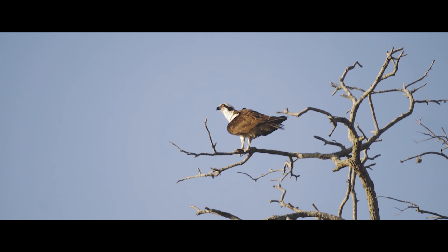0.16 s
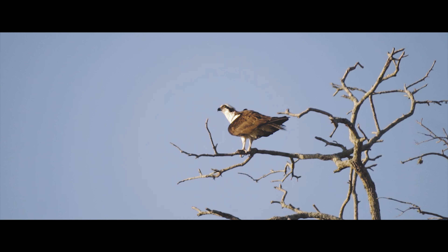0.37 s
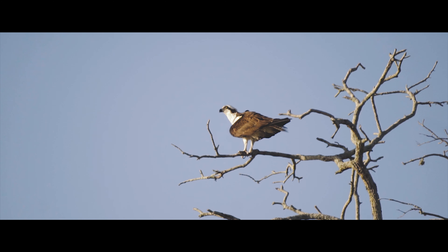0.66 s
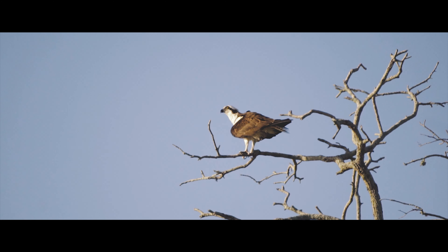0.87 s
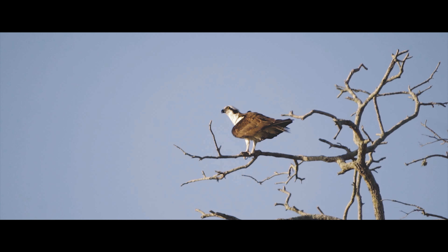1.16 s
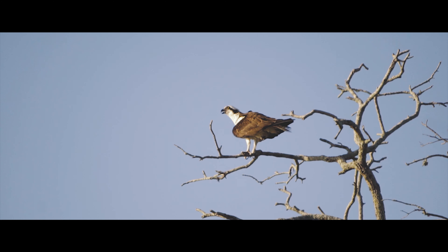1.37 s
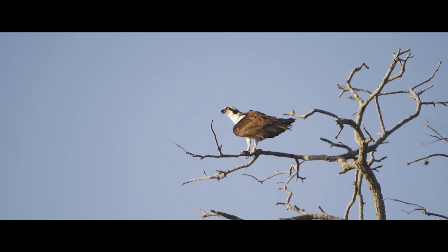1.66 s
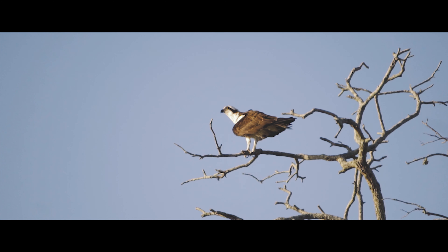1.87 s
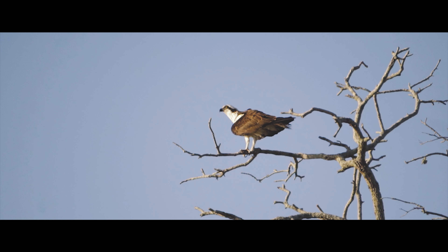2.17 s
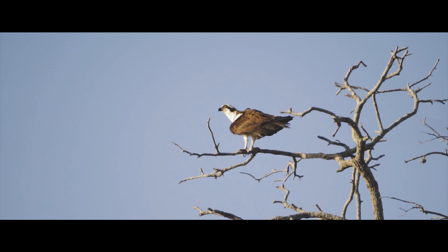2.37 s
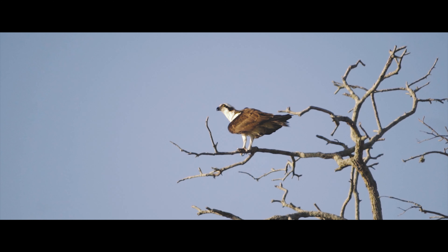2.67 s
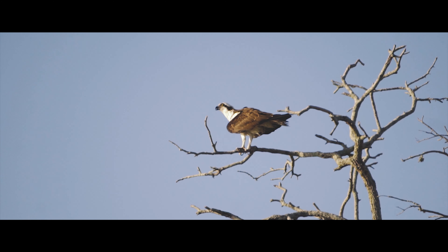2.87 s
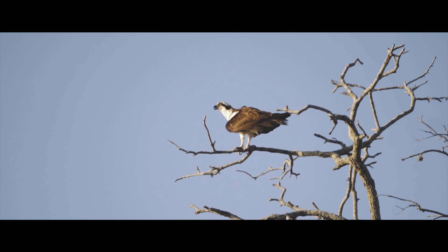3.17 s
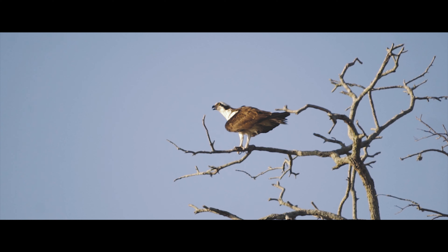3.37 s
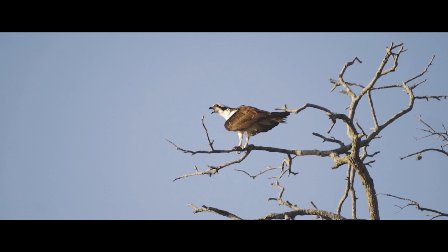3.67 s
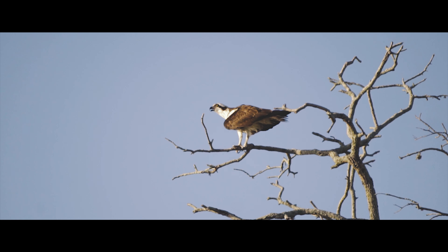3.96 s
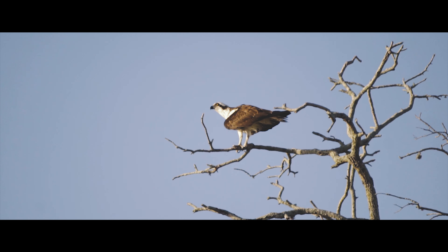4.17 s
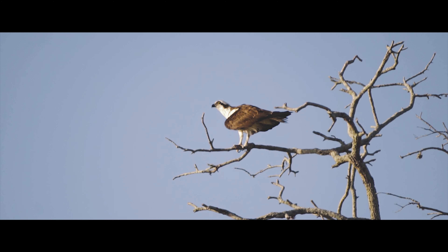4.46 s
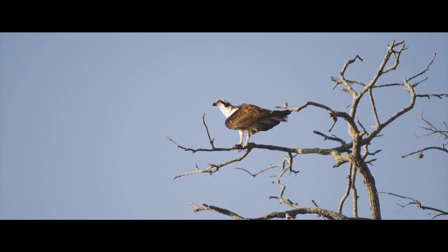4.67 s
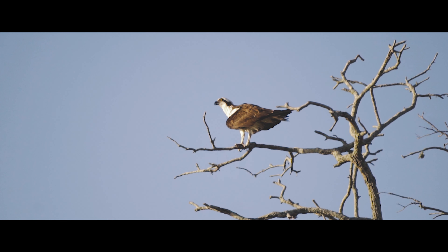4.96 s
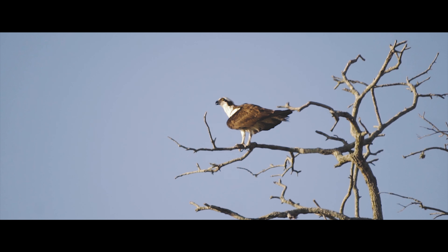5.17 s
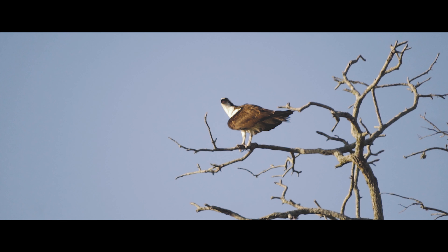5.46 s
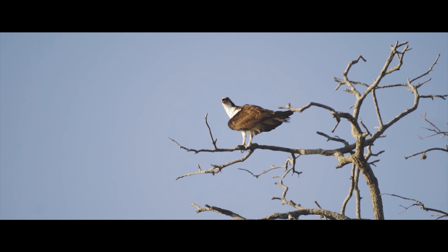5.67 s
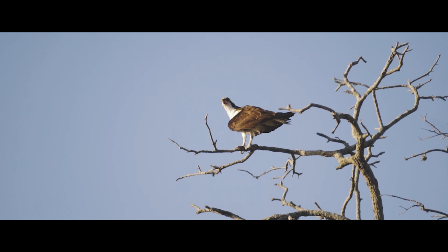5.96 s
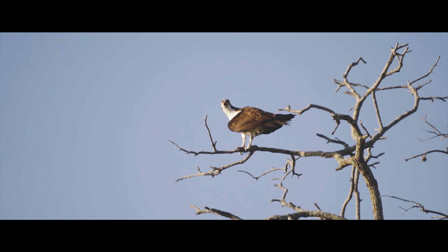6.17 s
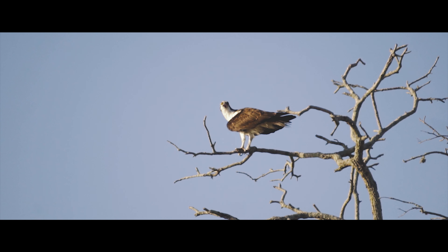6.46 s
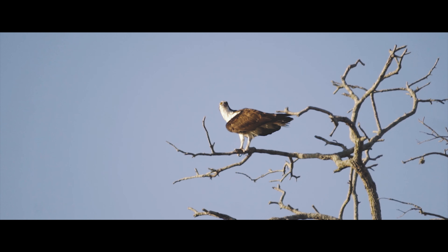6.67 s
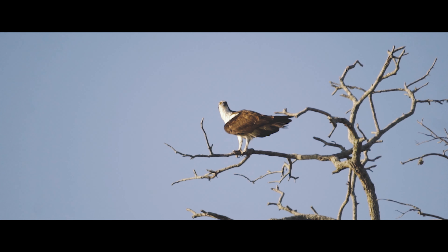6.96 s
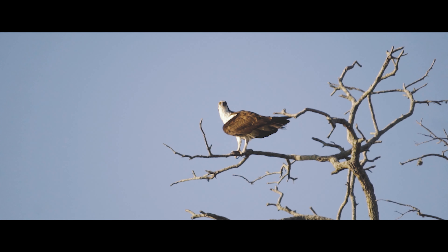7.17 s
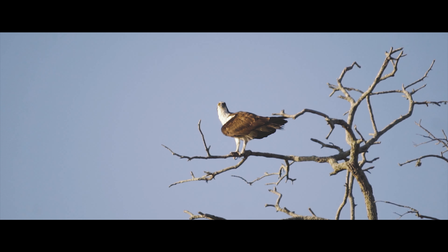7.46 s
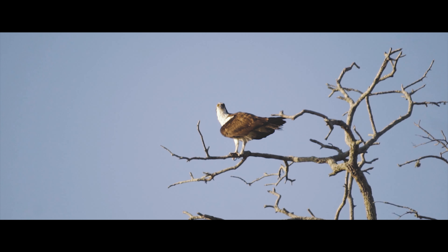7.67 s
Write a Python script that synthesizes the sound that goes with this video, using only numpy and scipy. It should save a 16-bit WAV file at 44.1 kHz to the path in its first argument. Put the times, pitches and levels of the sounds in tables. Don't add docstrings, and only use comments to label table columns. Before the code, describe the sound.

Outdoors, an osprey perched in a bare tree whistles three times, over two seconds apart. Each call is a brief, nearly pure tone sliding downward; the second starts higher and drops steeply, and the third is loudest with a tiny raspy flutter at its start. Woods return a long diffuse echo. Tiny birds chip far away over low wind and distant traffic. One mono camera microphone, calls fairly direct.

```python
import sys
import numpy as np
from scipy import signal
from scipy.fft import rfft, irfft
from scipy.io import wavfile
from scipy.ndimage import uniform_filter1d

SR = 44100
rng = np.random.default_rng(int(sys.argv[2]) if len(sys.argv) > 2 else 0)


def dump_mix(stems):
    frames = np.atleast_2d(stems).T
    limited = np.clip(frames, -1, 1)
    pcm = np.round(limited * 32767).astype(np.int16)
    wavfile.write(sys.argv[1], SR, pcm)


def volts_from_db(level):
    exponent = np.asarray(level, float) / 20
    return 10 ** exponent


N = 344862
t = np.arange(N) / SR


def band(x, lo_hz, hi_hz):
    return signal.sosfilt(signal.butter(2, [lo_hz, hi_hz], "band", fs=SR, output="sos"), x)


def steep_band(x, lo_hz, hi_hz):
    return band(band(x, lo_hz, hi_hz), lo_hz, hi_hz)


def unit(x):
    return x / np.sqrt(np.mean(x ** 2))


def smooth_twice(x, size):
    return uniform_filter1d(uniform_filter1d(x, size), size)


def colour(table, hz):
    f, db = np.transpose(table)
    return np.interp(np.log(hz), np.log(f), db)


def walk(rate):
    hold = int(SR / rate)
    steps = np.repeat(rng.standard_normal(N // hold + 1), hold)
    return unit(smooth_twice(steps, hold)[:N])


def decay(s, t60):
    return np.exp(-np.log(1000) * s / t60)


def flutter():
    start, end, flutter_hz = 6.443, 6.482, 235
    rough = np.interp(t, [start, start + 0.00056, end - .015, end], [0, 1, 1, 0])
    cycles = np.cumsum(flutter_hz * (1 + .1 * walk(200))) / SR
    return rough, rough * (np.sin(2 * np.pi * cycles) + .3 * walk(700))


# f/Hz, level/dB
BEAK_COLOUR = [(1750, 5.5), (2050, -1), (2350, 8), (2850, -5.5), (3300, -2), (3720, -0.5), (4350, 0),
               (5000, 0)]
# f/Hz, level/dB
THROAT_COLOUR = [(4200, 1), (4700, 13), (5200, 10.5), (6000, -8.5), (6500, -4.5), (7000, -2), (7800, -5),
                 (8500, 1.5), (9200, -1), (9700, -16.5)]
# second to fourth partial at edge 0, level/dB
LOWER_PARTIALS_DB = [(-46, -57, -70.5), (-38.5, -50.5, -67), (-32, -47, -53)]
# fifth to ninth partial at full voice, level/dB
HIGHER_PARTIALS_DB = [(-87.5, -81.5, -88.5, -97, -100), (-80, -87.5, -79.5, -85.5, -96),
                      (-58, -65.5, -71.5, -79, -87)]


def partial_levels(which, on, hz, voice_db, edge_db, rough, eddies):
    growth = .65, 1.0, .5
    rasp_bright_db = -10, -3, -7
    soft_db, soft_loss = 12, (0, 0, 1.5)
    unsteady_db = 1.5
    knee_db = (-59.5, -58.5, -50)[which]
    rasp_dull_db = 6

    softness_db = np.minimum(voice_db - voice_db.max() + soft_db, 0) * (1 - rough[on])
    levels = [voice_db]
    lower = zip(LOWER_PARTIALS_DB[which], growth, rasp_bright_db, soft_loss)
    for k, (top_db, grow, bright_db, loss) in enumerate(lower, start=2):
        voiced_db = top_db + grow * edge_db + colour(BEAK_COLOUR, k * hz)
        shaken_db = unsteady_db * np.roll(eddies, k * SR)[on]
        levels.append(voiced_db + bright_db * rough[on] + loss * softness_db + shaken_db)
    fade_db = np.minimum(levels[2] - knee_db, 0)
    for k, top_db in enumerate(HIGHER_PARTIALS_DB[which], start=5):
        dull_db = rasp_dull_db * (k - 4) * rough[on]
        levels.append(top_db + fade_db - dull_db + colour(THROAT_COLOUR, k * hz) + 2.5 * walk(30)[on])
    return levels


# t/s, f/Hz, voice level/dB, edge level/dB (how hard the membranes close)
FALLING_WHISTLES = [
    [(1.674, 1237, -63.5, -36.5), (1.684, 1209, -35, -16), (1.7, 1134, -33.5, -11.5),
     (1.722, 1023, -18, 10), (1.75, 981, -24, 5.5), (1.79, 939, -17.5, 1), (1.83, 900, -23.5, -0.5),
     (1.885, 841, -27.5, -6.5), (1.903, 787, -27, -19)],
    [(3.864, 2120, -51, -53), (3.88, 1940, -47, -35.5), (3.898, 1554, -38, -29), (3.912, 1335, -18.5, -7.5),
     (3.96, 1202, -16.5, 0.5), (4.04, 1041, -12.5, 7), (4.072, 976, -23.5, 3.5), (4.095, 957.4, -17, -4),
     (4.152, 889, -26.5, -26)],
    [(6.497, 1467, -13, 5.5), (6.526, 1368, -15, -1), (6.548, 1333, -9.5, 6.5), (6.575, 1277, -13.5, -3.5),
     (6.6, 1222, -13, 5), (6.64, 1131, -15, -3.5), (6.685, 1049, -16.5, -4), (6.705, 1033, -15.5, -1),
     (6.722, 1000, -25, -13)],
]
# t/s, f/Hz, voice level/dB, edge level/dB
RASP_ONSET = [
    (6.443, 1480, -43, -5),
    (6.451, 1620, -34, -1),
    (6.463, 1740, -31, -4),
    (6.481, 1750, -24.5, -3),
    (6.492, 1500, -17, 4),
]
# throat ring level/dB, wide noise level/dB, both under the first partial
BREATH_LEVELS = [(-58, -70), (-58, -66), (-52, -53)]


def osprey():
    depth, bend = .4, .1
    attack_s, release_s = .0014, .016
    rasp_air_db = -52
    out = np.zeros(N)
    rough, rasp = flutter()
    waver = 0.0012 * walk(90)
    air = rng.standard_normal(N)
    ring, wide = unit(band(air, 4760, 5200)), unit(steep_band(air, 1800, 5900))
    eddies = unit(smooth_twice(air, SR // 40))
    calls = FALLING_WHISTLES[0], FALLING_WHISTLES[1], [*RASP_ONSET, *FALLING_WHISTLES[2]]
    for which, (call, (ring_db, wide_db)) in enumerate(zip(calls, BREATH_LEVELS)):
        s, *columns = np.transpose(call)
        on = slice(int(s[0] * SR), int(s[-1] * SR))
        hz, voice_db, edge_db = (uniform_filter1d(np.interp(t[on], s, c), 250) for c in columns)
        phase = 2 * np.pi * np.cumsum(hz * (1 + bend * rasp[on] + waver[on])) / SR
        opening, closing = (t[on] - s[0]) / attack_s, (s[-1] - t[on]) / release_s
        gate = np.clip(np.minimum(opening, closing), 0, 1) * (1 + depth * rasp[on])
        breath = volts_from_db(ring_db) * ring[on] + volts_from_db(wide_db) * wide[on]
        out[on] += gate * volts_from_db(voice_db) * breath
        levels = partial_levels(which, on, hz, voice_db, edge_db, rough, eddies)
        for k, level_db in enumerate(levels, start=1):
            partial = np.sin(k * phase + rng.uniform(0, 2 * np.pi))
            out[on] += np.sqrt(2) * volts_from_db(level_db) * gate * partial
    bursts = unit(band(band(air, 1700, 9000), 1700, 6000))
    return out + volts_from_db(rasp_air_db) * rough * (1 + depth * rasp) * bursts


# f/Hz, t60/s, level/dB
WOODS_TAIL = [(870, 2.4, -24), (1290, 2.17, -23.5), (2280, 1.88, -18), (3800, 1.4, -21.5),
              (6500, .7, -31.5)]


def woods():
    branch_t60_s, branch_rise_s, branch_db = .22, .04, -18
    trunk_s, trunk_db = .027, -20
    edge_s, edge_wide_s, edge_db = .225, .024, -40
    clump_db = 1.8
    s = t[:2 * SR]
    noise = unit(band(rng.standard_normal(len(s)), 300, 5000))
    bright = unit(band(noise, 1800, 5000))
    near = decay(s, branch_t60_s) * np.clip(s / branch_rise_s, 0, 1) ** 2
    edge = np.exp(-.5 * ((s - edge_s) / edge_wide_s) ** 2)
    out = volts_from_db(branch_db) * noise * near / np.linalg.norm(near)
    out += volts_from_db(edge_db) * (noise + bright) * edge / np.linalg.norm(edge)
    out[int(trunk_s * SR)] += volts_from_db(trunk_db)
    clumps = volts_from_db(clump_db * walk(45)[:len(s)])
    for hz, t60, db in WOODS_TAIL:
        fade = clumps * decay(s, t60) * np.clip(s / 0.061, 0, 1)
        scatter = band(rng.standard_normal(len(s)), hz / 1.33, hz * 1.215)
        out += volts_from_db(db) * scatter * fade / np.linalg.norm(fade)
    return out


# t/s, length/s, top f/Hz, level/dB
HOOK_NOTES = [
    (3.267, 0.045, 2300, -55),
    (4.68, 0.038, 2540, -67.5),
    (6.957, 0.048, 2314, -50.5),
    (7.053, .04, 2320, -56),
]
# t/s, length/s, top f/Hz, level/dB
ARCH_NOTES = [
    (1.071, 0.055, 2390, -54.5),
    (1.079, .051, 2118, -48.5),
    (3.257, 0.08, 2390, -63.5),
]
# t/s, length/s, top f/Hz, level/dB
PEEP_NOTES = [(.645, .028, 2300, -70), (.685, .035, 2080, -67), (.712, .045, 2350, -74),
              (.782, .011, 3860, -75), (3.214, .05, 2720, -74), (3.23, .14, 2330, -69),
              (3.735, .075, 1250, -67), (3.826, .075, 930, -60), (4.283, .17, 335, -56),
              (4.857, .03, 2650, -74), (5.442, .04, 2780, -75.5)]


def chips():
    out = np.zeros(N)
    kinds = (HOOK_NOTES, (.88, .67)), (ARCH_NOTES, (.62, .6)), (PEEP_NOTES, (.93, .94))
    for notes, (rise, fall) in kinds:
        for s, length, top_hz, db in notes:
            u = np.linspace(0, 1, int(length * SR))
            dip = 1 - np.where(u < .5, rise, fall)
            hz = top_hz * (1 - dip * np.abs(2 * u - 1) ** 1.4)
            tone = np.sin(2 * np.pi * np.cumsum(hz) / SR)
            i = int(s * SR)
            out[i:i + len(u)] += np.sqrt(2) * volts_from_db(db) * np.sin(np.pi * u) ** .5 * tone
    return out


def leaves(x):
    s = t[:SR // 5]
    blur = rng.standard_normal(len(s)) * decay(s, .12)
    return x + volts_from_db(-3) * signal.fftconvolve(x, blur / np.linalg.norm(blur))[:N]


# t/s, length/s, level/dB
CHATTER_BOUTS = [
    (0, .05, -73),
    (.7, 0.59, -71),
    (2.8, 0.25, -68.5),
    (3.35, .15, -65.5),
    (5.4, 0.13, -71),
]


def chatter():
    rise_db_per_s, fall_db_per_s, rest_db = 76, 45, -83
    noise = unit(steep_band(rng.standard_normal(N), 1400, 2900))
    level_db = np.full(N, float(rest_db))
    for s, length, db in CHATTER_BOUTS:
        before, after = np.maximum(s - t, 0), np.maximum(t - s - length, 0)
        level_db = np.maximum(level_db, db - rise_db_per_s * before - fall_db_per_s * after)
    return noise * volts_from_db(level_db + 2.5 * walk(20))


# f/Hz, level/dB per Hz
HUM_SPECTRUM = [(12, -34.5), (20, 4), (64, -6.5), (102, -8), (190, -14), (252, -18), (456, -20),
                (493, -22.5), (576, -22), (806, -29.5), (1190, -33.5), (1320, -37.5), (2860, -49.5),
                (8260, -59), (9640, -64), (12500, -94.5), (21200, -120)]
# t/s, level/dB
WIND_LEVEL = [
    (0, -42),
    (.3, -52),
    (1, -48),
    (2.4, -51),
    (3.4, -51),
    (3.9, -46),
    (5.2, -49.5),
    (6.5, -48.5),
    (7.1, -49.5),
    (7.82, -46.5),
]


def wind_and_traffic():
    approach_db_per_s = .02, 0.49, 2, 0.12
    wind_share = 1., 0.61, .1, 0.02
    gust_db = 0.93, 1.6, 1.2, 0.13
    nearer = np.maximum(t - 4.05, 0)
    wind_db = np.interp(t, *np.transpose(WIND_LEVEL))
    swells = [rate * nearer + share * wind_db + gust * walk(2.5)
              for rate, share, gust in zip(approach_db_per_s, wind_share, gust_db)]
    swells.append(np.zeros(N))
    hz = np.maximum(np.arange(N // 2 + 1) * SR / N, 5)
    spectrum = rfft(rng.standard_normal(N)) * volts_from_db(colour(HUM_SPECTRUM, hz))
    scale = volts_from_db(-40) / np.std(irfft(spectrum, N))
    out = np.zeros(N)
    for centre in 14 * 2 ** np.arange(0, 10, .5):
        share = np.cos(np.pi / 2 * np.clip(2 * np.log2(hz / centre), -1, 1)) ** 2
        swell_db = swells[np.searchsorted([60, 120, 240, 1700], centre)]
        flicker_db = (.8 if centre < 1700 else .3) * walk(5)
        out += scale * irfft(spectrum * share, N) * volts_from_db(swell_db - swell_db.mean() + flicker_db)
    return out


def scene():
    bird, far = osprey(), leaves(chips())
    echoes = signal.fftconvolve(bird + volts_from_db(3.5) * far, woods())[:N]
    return (bird + far + echoes + chatter() + wind_and_traffic())[None]


def low_pass(x):
    return signal.sosfilt(signal.butter(12, 9790, fs=SR, output="sos"), x)


def record(dry):
    heard = signal.sosfilt(signal.butter(2, 24.3, "high", fs=SR, output="sos"), dry)
    mix = signal.sosfilt(signal.ellip(10, .2, 70, 9750, fs=SR, output="sos"), heard)
    return low_pass(mix)


dry = scene()
out = record(dry)
dump_mix(out)
```